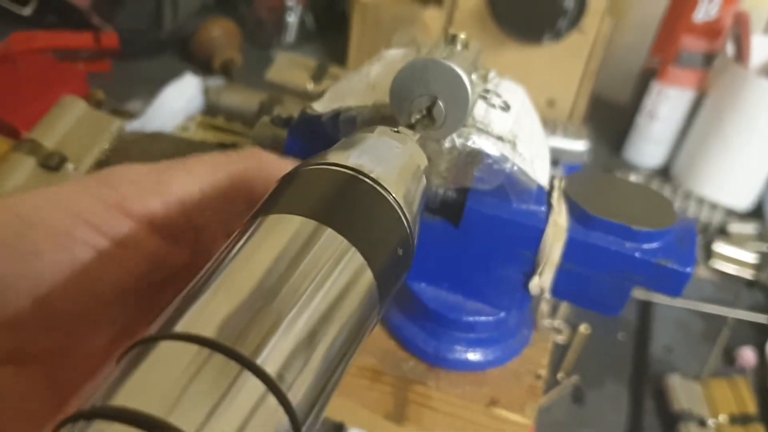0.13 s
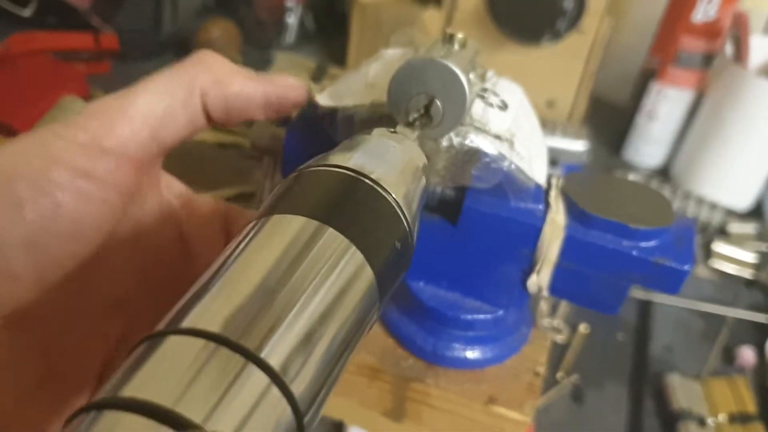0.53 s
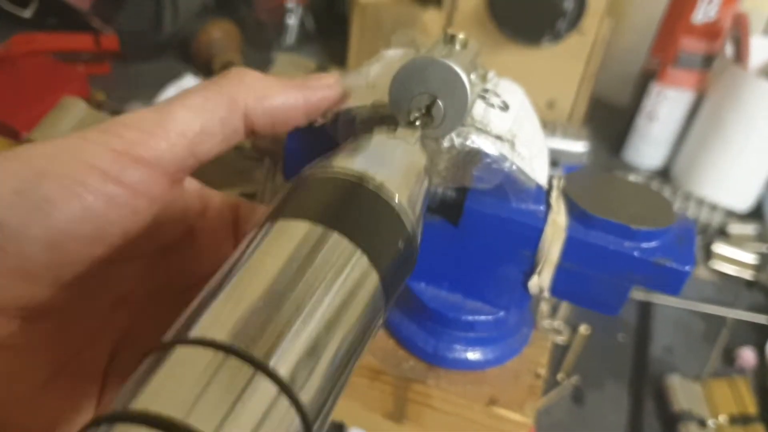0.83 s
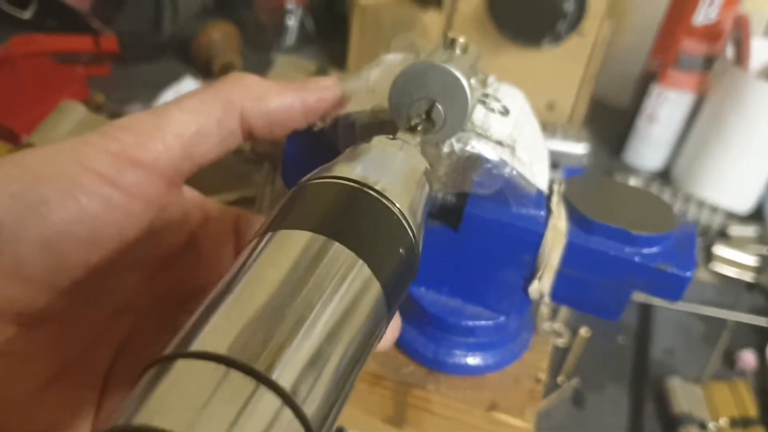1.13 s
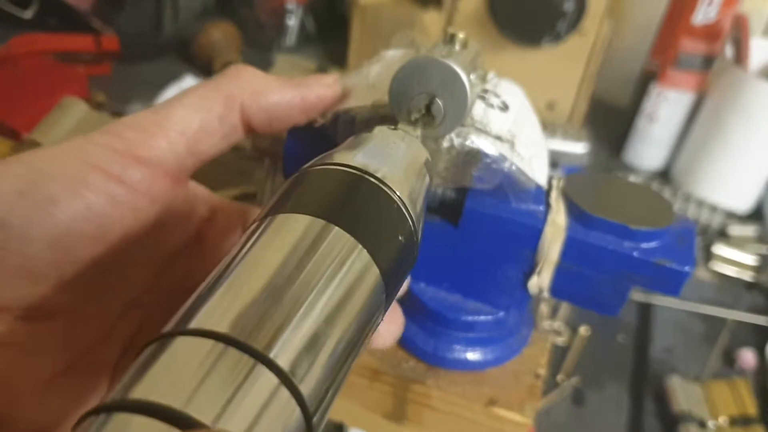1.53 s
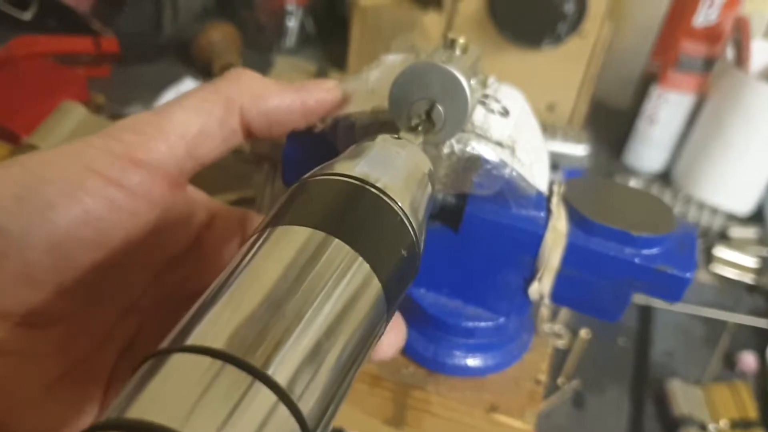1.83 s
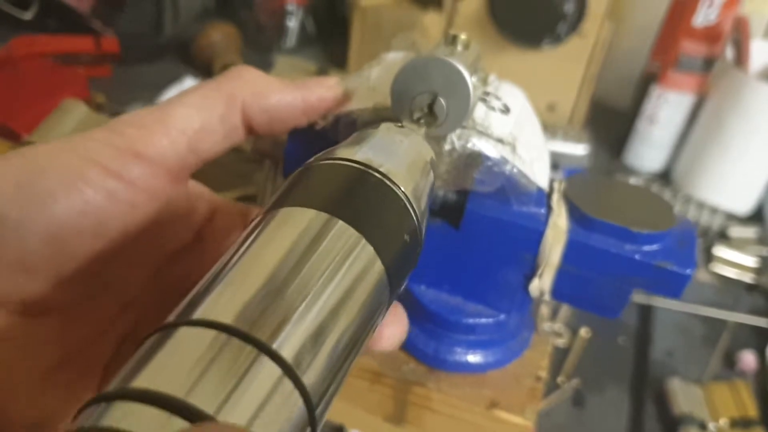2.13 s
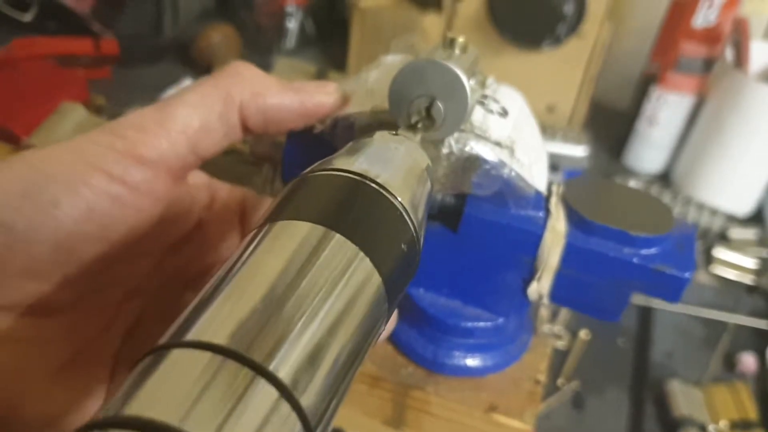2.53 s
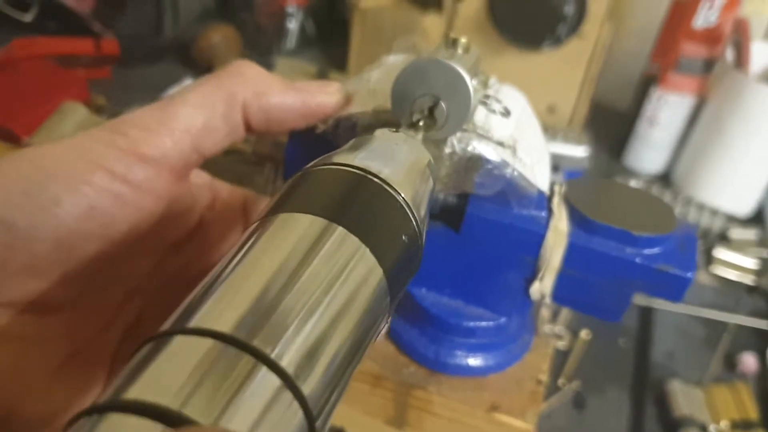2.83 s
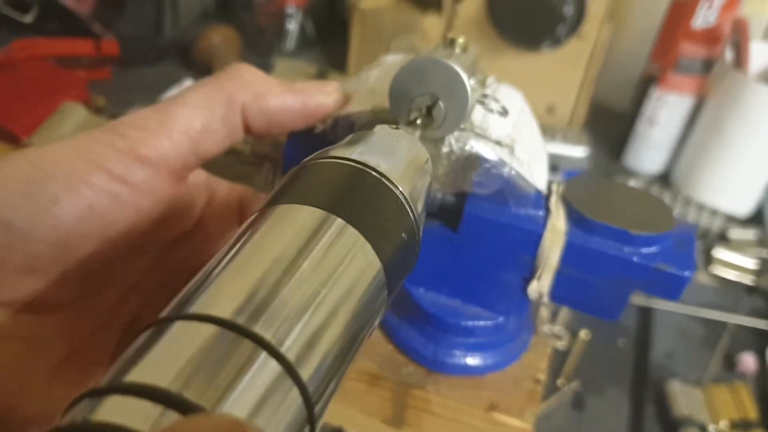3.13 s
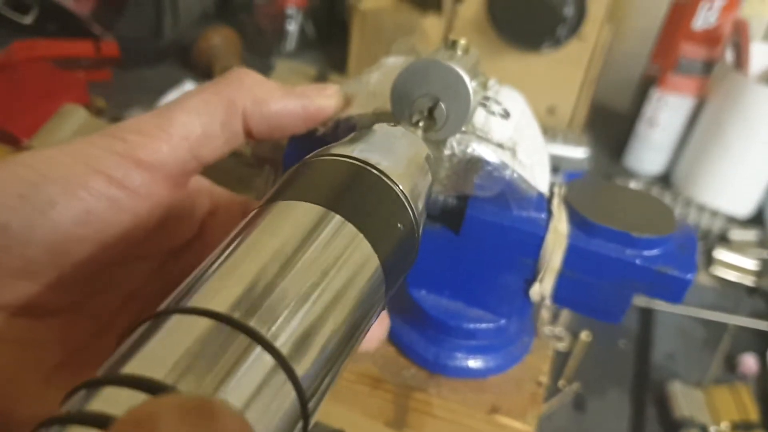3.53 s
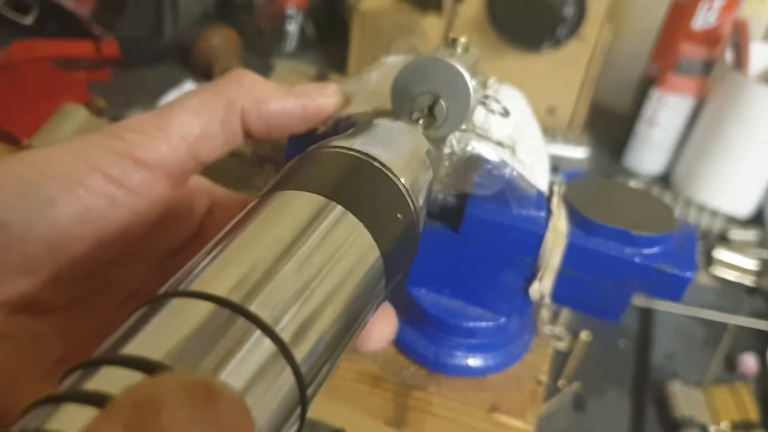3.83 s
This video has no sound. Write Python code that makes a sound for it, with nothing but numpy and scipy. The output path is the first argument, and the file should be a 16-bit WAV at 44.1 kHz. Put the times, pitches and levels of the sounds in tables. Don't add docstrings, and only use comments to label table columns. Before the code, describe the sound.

Electric lock pick tool buzzes in a short harsh burst, clatters down, then rattles on continuously

```python
import sys
import numpy as np
from scipy import signal
from scipy.fft import rfft, irfft, next_fast_len
from scipy.io import wavfile
from scipy.ndimage import uniform_filter1d, map_coordinates

SR = 44100
rng = np.random.default_rng(int(sys.argv[2]) if len(sys.argv) > 2 else 0)


def waveform_to_disk(signal):
    frames = np.transpose(np.atleast_2d(signal))
    scaled = np.clip(frames, -1, 1) * 32767
    samples = np.round(scaled).astype(np.int16)
    wavfile.write(sys.argv[1], SR, samples)


def makeup_ratio(level_db):
    decades = np.asarray(level_db, float) / 20
    return 10 ** decades


N = 176400
T = np.arange(N) / SR
BLOW_SIZE = np.sqrt(SR / 120)

# time in seconds, cam turns per second, rattle in dB,
# needle bite in dB, press on the lock in dB.
BURST = [
    (.445, 89.4, -30, -3.5, -6.5),
    (.5, 116, -25.5, -1.5, -7.5),
    (.54, 119, -24.5, -4.5, -7.5),
    (.59, 127, -27, -12, -6),
    (.665, 131, -30, -9.5, -5.5),
    (.7, 109, -29.5, -6.5, -4.5),
    (.74, 92, -33, -8, -3.5),
    (.78, 72, -33, -8, -5),
    (.815, 52, -35.5, -7, 0),
]
START = [
    (1.115, 85, -46, 6.5, 4),
    (1.135, 85, -25.5, 0, -2),
    (1.169, 104, -26.5, -1.5, -14),
]


def unit(x):
    return x / np.sqrt(np.mean(x ** 2) + 1e-20)


def along(points, hz):
    f, v = np.transpose(points)
    return np.interp(np.log(hz + 1), np.log(f + 1), v)


def over_time(points):
    s, *columns = np.transpose(points)
    return [np.interp(T, s, c) for c in columns]


def smooth(x):
    return uniform_filter1d(x, size=SR // 40)


def wobble(rate, count):
    knots = rng.standard_normal((count, int(N / SR * 40)))
    place = T * min(rate, 39)
    return np.array([map_coordinates(k, [place], order=1) for k in knots])


def filtered(x, response):
    m = next_fast_len(N + SR // 2)
    return irfft(rfft(x, m) * response(np.fft.rfftfreq(m, 1 / SR)), m)[..., :N]


def peak(f, hz, width):
    return 1j * f * width / (hz * hz - f * f + 1j * f * width)


def dark(x, hz):
    return filtered(x, lambda f: (1j * f / (hz + 1j * f)) ** 2)


def soft(x, hz):
    return filtered(x, lambda f: (hz * hz / (hz * hz - f * f + 1.2j * f * hz)) ** 2)


def spikes(s, gain):
    at = np.clip(s * SR, 8, N - 9)[:, None]
    i = at.astype(int) + np.arange(-7, 9)
    pulse = np.sinc(i - at) * np.cos((i - at) * np.pi / 16) ** 2
    return np.bincount(i.ravel(), (gain[:, None] * pulse).ravel(), N)


def struck(blows, burr_db, between, sharp=1):
    decay_s, rise_s, apart = .0011, .0002, .6
    t = np.arange(SR // 50) / SR
    tail = np.exp(-t / decay_s) * (1 - np.exp(-t / rise_s))
    tail = tail / np.linalg.norm(tail)
    envelope = makeup_ratio(burr_db) * np.abs(signal.fftconvolve(blows, tail)[:N]) + between
    grit = rng.standard_normal((3, N))
    return sharp * blows + envelope * (np.sqrt(1 - apart ** 2) * grit[0] + apart * grit[1:])


def rung(force, modes, gain_db):
    hz, width, left_db, right_db, lead = np.transpose(modes)[:, :, None, None]
    side = np.array([[1], [-1]])
    sign = (-1.) ** np.arange(len(modes))[:, None, None]
    m = next_fast_len(N + SR // 2)
    f = np.fft.rfftfreq(m, 1 / SR)
    z = rfft(force * makeup_ratio(gain_db)[:, None], m) * sign * peak(f, hz, width)
    ports = makeup_ratio(np.concatenate([left_db, right_db], axis=1)) * np.exp(.5j * lead * side)
    return irfft((z * ports).sum(0), m)[:, :N]


def lean_db(modes, centre_hz):
    tilt_db = 15.5
    mid = np.median(centre_hz)
    octaves = np.log2(np.array(modes)[:, :1] / mid)
    return np.clip(tilt_db * octaves * np.log2(centre_hz / mid), -9, 9)


def hum():
    # frequency in Hz, level in dB per Hz.
    drone = [(15, -67), (25, -53), (43, -5.5), (66, -0.5), (78, -8.5), (96, -22), (134, -10), (2500, -63.5),
             (3250, -101), (5500, -120)]
    # time in seconds, level in dB.
    rise = [(0, 5.5), (2.8, 8), (3.5, 6.5)]
    hum_db, hiss_db, sway_db = -59.5, -55, 2.2
    spectrum = [(12, -60), *drone[:-2], (4000, hiss_db), (16000, hiss_db - 10)]
    noise = rng.standard_normal((3, N))
    pair = filtered(noise[0] + 0.27 * noise[1:], lambda f: makeup_ratio(along(spectrum, f)))
    level_db = hum_db + over_time(rise)[0] + sway_db * wobble(5.1, count=1)
    return unit(pair) * makeup_ratio(level_db) * makeup_ratio([[1.7], [-1.7]])


def room(x):
    # frequency in Hz, 60 dB decay time in seconds.
    decay = [(200, 1), (2000, 0.11), (7000, 0.085), (14000, 0.013)]
    hz, t, z = signal.stft(rng.standard_normal((2, SR // 2)), SR, nperseg=256)
    tail = signal.istft(z * makeup_ratio(-60 * t / along(decay, hz)[:, None]), SR, nperseg=256)[1]
    tail = np.pad(tail / np.linalg.norm(tail[0]), ((0, 0), (150, 0)))
    return filtered(signal.fftconvolve(x, tail, axes=1)[:, :N], lambda f: f ** 2 / (f ** 2 + 400 ** 2))


def cam():
    # time in seconds, cam turns per second.
    run_speed = [(1.2, 116), (1.25, 113), (1.38, 126), (1.5, 117), (1.59, 116), (1.67, 122), (1.76, 122),
                 (1.9, 117), (2.04, 120), (2.42, 116.5), (2.81, 114.5), (2.91, 125), (3.0, 125),
                 (3.21, 130), (3.4, 131), (3.47, 124), (3.72, 125), (4.0, 122)]
    # time in seconds, turns per second lost,
    # fall in seconds, recovery in seconds.
    binds = [(1.85, 5, .08, .04), (2.16, 9, .1, .16), (2.63, 3, .05, .06), (3.07, 7, .07, .09),
             (3.52, 8, .06, .06), (3.78, 14, .06, .1), (3.88, 10, .1, .06)]
    beats = [
        .7626,
        1.1546,
    ]
    early = np.array([*BURST, *START])
    speed = smooth(over_time([*early[:, :2], *run_speed])[0])
    for at, loss, fall, recovery in binds:
        speed = speed - smooth(np.interp(T, [at - fall, at, at + recovery], [0, loss, 0]))
    on = (T > BURST[0][0]) & ((T < BURST[-1][0]) | (T > START[0][0]))
    turns = np.cumsum(speed * on * (1 + .002 * wobble(20, count=1)[0])) / SR
    late = (np.interp(beats, T, turns) + .48) % 1 - .5
    shift = np.interp(T, [.5, beats[0], 1, 1.1], [0, late[0], *late])
    turns = np.maximum.accumulate(turns - shift) + T * 1e-6
    return on, speed, turns


def effort():
    # time in seconds, rattle in dB, needle bite in dB, press on the lock in dB.
    run_effort = [(1.2, -27, 3.5, -2), (1.21, -27, -1, -8), (1.52, -27.5, -2, -9), (1.64, -30.5, 0, -6),
                  (1.89, -28, 0, -7.5), (1.93, -34, 6, 0), (2.04, -30, 3, -6.5), (2.17, -28.5, -4, -5.5),
                  (2.24, -25.5, -3.5, -7), (2.94, -29, -0.5, -7.5), (3.02, -28, 0, -10.5),
                  (3.13, -33, 4, -5), (3.41, -31.5, 2.5, -6.5), (3.47, -26, -3.5, -6.5),
                  (3.56, -32, 2, -5.5), (3.71, -28.5, -2, -13.5), (3.73, -28.5, 0.5, -5),
                  (4.0, -30.5, 0.5, -7.5)]
    early = np.delete(np.array([*BURST, *START]), 1, axis=1)
    return [smooth(c) for c in over_time([*early, *run_effort])]


def cam_blows(on, turns, level_db):
    back_turn, flick_jitter_s, back_jitter_s, stumble = .56, .00001, .00015, .45
    scatter_db, push_scatter_db = 2.3, 1.2
    count = np.arange(600.) + .02
    luck = np.clip(rng.standard_normal((600, 5)), -2.5, 1.8)
    uneven = np.exp(stumble * 2 * wobble(39, count=1)[0, ::290][:600])
    flick = np.interp(count, turns, T, right=9) + flick_jitter_s * luck[:, 0] * uneven
    back = np.interp(count + back_turn, turns, T, right=9) + back_jitter_s * luck[:, 1]
    live = 1. * (back < 5) * np.interp(flick, T, on) * np.interp(back, T, on)
    size = BLOW_SIZE * makeup_ratio(level_db)
    hits = size * spikes(flick, live * makeup_ratio(scatter_db * luck[:, 2]))
    slaps = size * spikes(back, live * makeup_ratio(scatter_db * luck[:, 3]))
    pushes = size * spikes(flick, live * makeup_ratio(push_scatter_db * luck[:, 4]))
    return hits, slaps, pushes


def single_knocks():
    # time in seconds, peak in dB, body over click in dB.
    knocks = [(0.1625, -58, -12), (0.1874, -47.5, -35), (0.3614, -54, -27), (0.3681, -52, -24),
              (0.3678, -41, -30), (0.3744, -42, -31), (0.3805, -36.5, -33), (0.4105, -44, -25),
              (0.414, -47, -11), (0.423, -52, -11), (0.4304, -40, -12), (0.83, -22.5, -6.5),
              (0.8531, -28.5, -7), (0.864, -36, -1), (0.8744, -30.5, -2), (0.8974, -33, -0.5),
              (0.909, -37, -7), (0.919, -41, 4), (0.9364, -39.5, -1.5), (0.9733, -48, -18),
              (0.981, -60.5, -6), (1.059, -51.5, -3), (1.0635, -62.5, -18.5), (1.078, -58, -14),
              (1.088, -44, -7), (1.0908, -31.5, -11), (1.1034, -37, -1), (1.1072, -49, 1), (1.113, -47, 0),
              (1.118, -38, -6), (1.1284, -26, -10), (1.135, -22, -17)]
    knock_db = -10.5
    when, peak_db, body_db = np.transpose(knocks)
    clicks = spikes(when, BLOW_SIZE * makeup_ratio(peak_db + knock_db))
    taps = spikes(when, BLOW_SIZE * makeup_ratio(peak_db + body_db + knock_db))
    return clicks, taps


def scraping():
    # start in seconds, end in seconds, level in dB, level at the end in dB.
    scrapes = [
        (0.187, 0.265, -63.5, -77.5),
        (0.167, .29, -77, -86),
        (0.35, 0.418, -75, -51),
        (0.418, 0.442, -41, -58),
        (0.806, 0.965, -37, -57.5),
        (0.966, 1.05, -57, -80),
        (1.068, 1.092, -64, -54),
        (1.086, 1.117, -39, -40),
    ]
    return sum((T > a) * (T < b) * makeup_ratio(np.interp(T, [a, b], [db, end_db])) for a, b, db, end_db in scrapes)


def hand_load():
    # time in seconds, body centre in Hz, needle centre in Hz, 7.3 kHz pin ring in dB.
    grip = [(0.45, 1030, 2680, -1), (0.56, 890, 2930, -5), (0.62, 920, 2370, 1.5), (0.98, 1190, 2520, -3),
            (1.03, 820, 2520, -2), (1.23, 1149, 2810, -3.5), (1.3, 930, 2730, -1.5), (1.54, 1010, 2580, -1),
            (2.65, 1130, 2830, -2.5), (2.86, 1070, 2680, -2), (2.91, 784, 2840, -1.5),
            (3.02, 1060, 2723, -2.5), (3.17, 920, 2680, 5), (3.34, 1070, 2630, 3), (3.5, 920, 2850, -1.5),
            (3.57, 1410, 2600, 1.5), (3.96, 1040, 2900, -1), (4.0, 925, 3000, 6)]
    return over_time(grip)


def bench_shake(on, speed, turns):
    # frequency in Hz, width in Hz, level in dB.
    bench_modes = [(85, 50, 5), (119, 24, 0), (228, 30, 1), (248, 11, 15)]
    # multiple of the turn, level in dB.
    harmonics = [(1, -42.5), (2, -50.5)]
    # time in seconds, shake in dB.
    seat = [(.45, -3.5), (.6, 3), (.72, 2.5), (.8, 1.5), (1.2, 0), (1.4, 3), (1.6, -1.5), (1.8, 1.5),
            (2.1, -1), (2.3, -1.5), (2.6, -1.5), (2.85, -2.5), (3.05, 0), (3.2, 1), (3.35, -8.5),
            (3.5, -1.5), (3.7, 2), (4.0, -3)]
    stiff = .08

    def bench(f):
        return stiff + sum(makeup_ratio(db) * np.abs(peak(f, hz, width)) ** 2 for hz, width, db in bench_modes)

    lean = makeup_ratio(over_time(seat)[0] + wobble(5, count=len(harmonics)))
    swell = smooth(1. * on) * speed / 120 * lean
    return sum(g * makeup_ratio(db) * np.real(bench(k * speed) * np.exp(2j * np.pi * k * turns))
               for g, (k, db) in zip(swell, harmonics))


def bench_thump(on, speed, level_db, taps, pushes):
    lurch_db, coast_db, thump_db, panel_db = 28.5, 20.5, -4.5, -24
    slow = np.clip(2 - speed / 50, 0, 1)
    rocking = makeup_ratio(lurch_db) * taps + makeup_ratio(coast_db) * pushes * on * slow
    loose = pushes * (1 + 1.9 * rng.standard_normal(N))
    thump = filtered(rocking, lambda f: peak(f, 95, 88) * peak(f, 100, 160))
    thump = thump + filtered(loose, lambda f: makeup_ratio(thump_db) * peak(f, 374, 144))
    panel = filtered(rng.standard_normal(N), lambda f: peak(f, 274, 25.125) + 0.29 * peak(f, 160, 78))
    return thump + makeup_ratio(level_db + panel_db) * on * unit(panel)


def vise_thud(pushes, drag, body_hz):
    # frequency in Hz, width in Hz, left in dB, right in dB, phase in radians by which left leads.
    vise = [(517, 156, -6.5, -8.5, 0.1), (713, 113, -1, -3, 0.49), (1077, 346, -0.5, 0.5, 0.1),
            (1333.5, 46, -1.5, 4, 1), (1670, 310, -9.5, -9, 0.55)]
    thud_db, burr_db, grip_db = 16, -15, 2.4
    gain_db = thud_db + lean_db(vise, body_hz) + grip_db * wobble(11, count=len(vise))
    return soft(dark(rung(struck(pushes, burr_db, 0.27 * drag), vise, gain_db), 346), 2670)


def needle_ring(flicks, grit, needle_hz):
    # frequency in Hz, width in Hz, left in dB, right in dB, phase in radians by which left leads.
    needle = [(1968, 700, -11.5, -7.5, 0.09), (2300, 150, -3.5, -2, 2.12), (2841, 623, -0.5, -9.5, 1.64),
              (3204, 300, -0.5, 1.5, 2.32)]
    needle_db, burr_db, grip_db = 20.5, -14, 1.07 * 2.4
    gain_db = needle_db + 4.0 * lean_db(needle, needle_hz) + grip_db * wobble(10, count=len(needle))
    return soft(dark(rung(struck(flicks, burr_db, grit), needle, gain_db), 820), 4040)


def pin_rattle(blows, chatter, on, ring_db, pin_db):
    # frequency in Hz, width in Hz, left in dB, right in dB, phase in radians by which left leads.
    steel = [(4600, 3060, -7.5, -9.5, 3.36), (5280, 250, -16, -3, 4.1), (7336, 433, -10, -4, 5.16),
             (9580, 1150, -5.5, -13, 7.85), (11830, 4800, -8, -18, 6.15), (12880, 430, -20, -7.5, 7.5),
             (13840, 700, -29.5, -12, 7.3)]
    rattle_db, drift_db, burr_db, sharp = 10, 1.6, 5.5, .5
    bite_share, idle_db, bright_hz = 0.43, 2.5, 9500
    bite_db = np.where(on, bite_share * ring_db, idle_db) / (1 + (np.array(steel)[:, :1] / bright_hz) ** 8)
    bite_db[2] = bite_db[2] + pin_db
    force = struck(blows, burr_db, chatter, sharp)
    return dark(rung(force, steel, rattle_db + drift_db * wobble(9, count=len(steel)) + bite_db), 2680)


def tool():
    # frequency in Hz, width in Hz, depth from 0 to 1.
    valleys = [(4150, 850, .75), (8600, 600, .7)]
    back_db, back_ring_db, tap_thud_db, chatter_db, ring_grit = -2, -7, -2.5, -1, .08
    on, speed, turns = cam()
    level_db, ring_db, thud_db = effort()
    hits, slaps, pushes = cam_blows(on, turns, level_db)
    clicks, taps = single_knocks()
    drag = scraping()
    body_hz, needle_hz, pin_db = hand_load()

    chatter = on * makeup_ratio(level_db + chatter_db) + drag
    rattle = pin_rattle(hits + makeup_ratio(back_db) * slaps + clicks, chatter, on, ring_db, pin_db)
    flicks = makeup_ratio(ring_db) * (pushes + makeup_ratio(back_ring_db) * slaps) + taps
    grit = ring_grit * on * makeup_ratio(level_db + ring_db) + 0.22 * drag
    ring = needle_ring(flicks, grit, needle_hz)
    pushes = pushes * makeup_ratio(thud_db) + makeup_ratio(tap_thud_db) * taps
    metal = rattle + ring + vise_thud(pushes, drag, body_hz)
    metal = filtered(metal, lambda f: np.prod([1 - depth * peak(f, hz, width) for hz, width, depth in valleys], axis=0))
    low = bench_shake(on, speed, turns) + bench_thump(on, speed, level_db, taps, pushes)
    return metal + low * makeup_ratio([[.8], [-.8]])


def scene():
    near = tool()
    return near + makeup_ratio(-12) * room(near) + hum()


def band_limit(x):
    return signal.sosfilt(signal.butter(12, 16800, fs=SR, output="sos"), x)


def record(dry):
    top_hz, edge_hz = 15850, 30
    mix = filtered(dry, lambda hz: (1 - np.tanh((hz - top_hz) / edge_hz)) / 2)
    return band_limit(mix)


dry = scene()
out = record(dry)
waveform_to_disk(out)
```